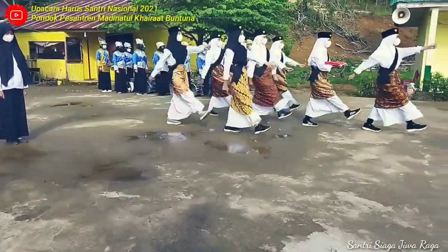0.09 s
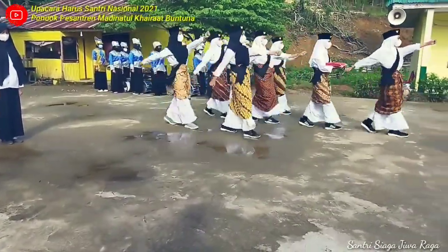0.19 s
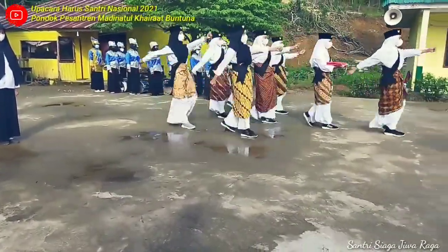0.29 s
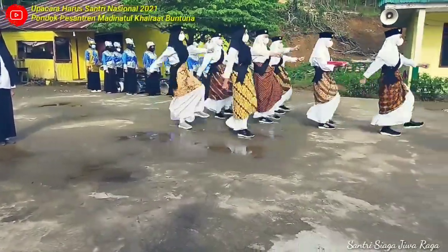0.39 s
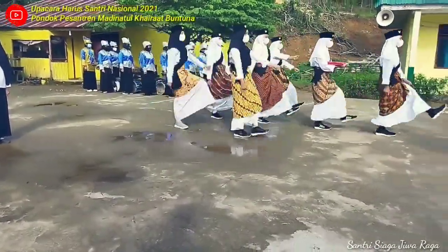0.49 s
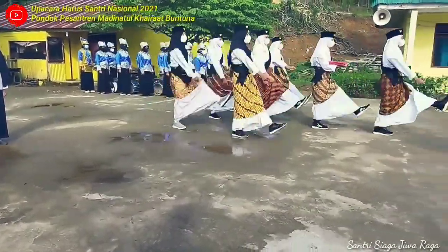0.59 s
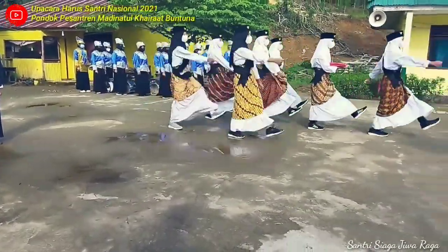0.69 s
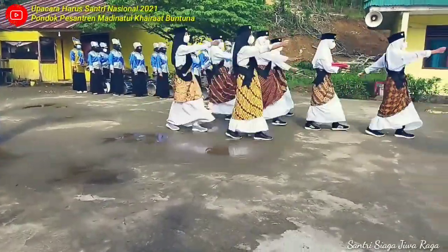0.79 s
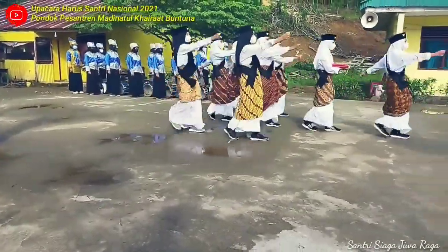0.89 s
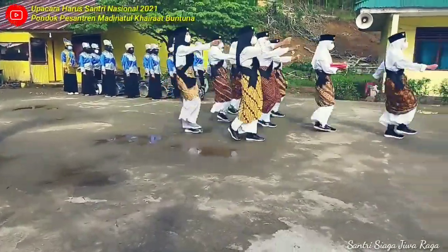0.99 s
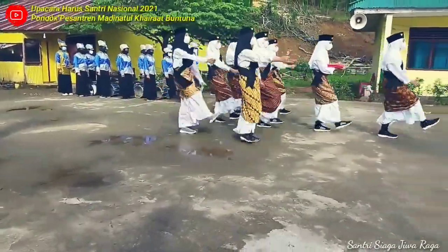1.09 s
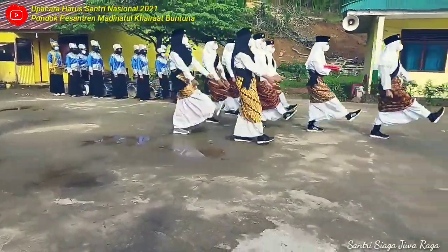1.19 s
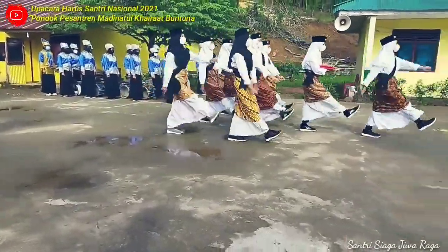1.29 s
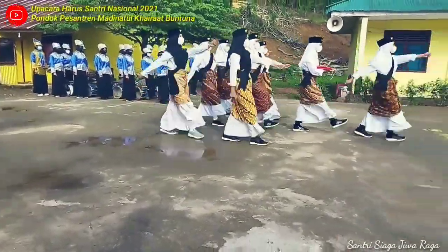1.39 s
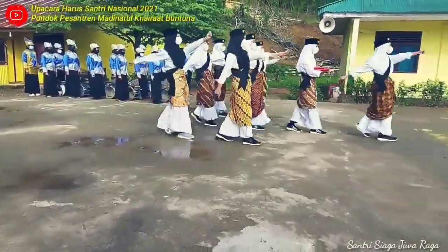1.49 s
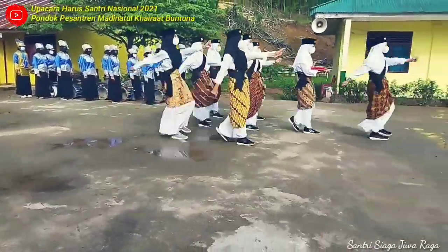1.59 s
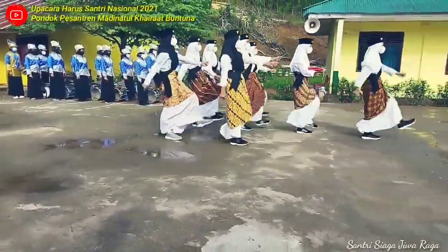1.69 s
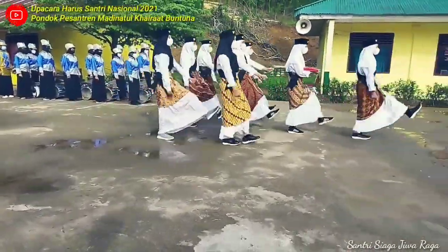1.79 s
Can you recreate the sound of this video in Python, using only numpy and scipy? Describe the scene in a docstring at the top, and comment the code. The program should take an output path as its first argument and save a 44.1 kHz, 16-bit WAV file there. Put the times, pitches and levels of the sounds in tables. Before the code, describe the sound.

Marching footsteps on damp concrete: three ragged volleys of flat, sharp sole slaps at about 0.2, 0.82 and 1.45 seconds, each spread over roughly a tenth of a second with gritty scuffing. Buildings return a short wash and faint slap-backs. Dull low microphone bumps near 0.24, 0.45 and 0.87, a soft footfall at 1.15. A faint bird's falling whistles, clearest around 1.0, over steady outdoor rumble and hiss.

```python
"""A small squad marches three paces across a damp concrete yard, not quite in unison: volleys of sole slaps.
Each slap is three bands of shaped noise plus a short ring; dense random grains make the gritty scuff under it.
The buildings answer with a short wash of decaying noise and two faint slap-backs.
Low decaying sines make dull bumps at the microphone and one soft footfall; a faint, distant bird whistles falling notes.
Open air surrounds it all as coloured noise, a steady rumble and hiss."""
import sys
import numpy as np
from scipy import signal
from scipy.fft import rfft, irfft, next_fast_len
from scipy.io import wavfile
from scipy.ndimage import uniform_filter1d

SR = 44100
rng = np.random.default_rng(int(sys.argv[2]) if len(sys.argv) > 2 else 0)


def generate_wav(sig):
    """Save sig (samples, or channels by samples) to the path in sys.argv[1] as 16-bit PCM at SR."""
    pcm = np.round(np.clip(np.atleast_2d(sig).T, -1, 1) * 32767).astype(np.int16)
    wavfile.write(sys.argv[1], SR, pcm)


N = 81585
T = np.arange(N) / SR  # s

# Open air around the microphone, spectrum shape: (f/Hz, relative level/dB per Hz)
AIR_COLOUR = [(12, -24), (20, 4), (30, -14), (38, -23), (53, -9), (112, -11), (125, -9), (140, -17.5),
              (175, -24), (281, -26), (323, -28), (351, -29.5), (463, -27), (612, -29), (703, -33.5),
              (831, -24), (981, -34.5), (1130, -29), (1530, -33), (1810, -31), (4170, -35), (5980, -43.5),
              (8590, -31), (11300, -43), (15400, -41)]
AIR_DB = -49.5  # rms

# Soles meeting the ground: (t/s, level/dB before trims, hollow body/dB and bright crack/dB
# relative to the middle smack, ring f/Hz)
SLAPS = [(0.203, -41, -18, 7.5, 960), (0.2106, -24.5, 1, 3, 980), (0.2206, -21.5, -7, 6, 1374),
         (.2250, -25.5, -10, 3, 660), (0.2313, -27, -6, -10, 1383), (.2400, -32.5, 6.5, -4, 480),
         (.2450, -30, 3.5, 5, 1050), (0.2528, -33.5, -6, -7, 633), (0.265, -27.5, -2, -4, 2245),
         (0.2671, -30, -2, 6, 2745), (.4510, -50, -3, -2, 1190), (0.8206, -51.5, 8, 14.5, 770),
         (.8275, -25.5, -29, -11, 510), (0.8334, -27, 2, 3.5, 1410), (0.8401, -25, -7, -18, 1480),
         (.8510, -29.5, -3.5, 8.5, 2810), (0.8599, -29, 2, -18, 2020), (0.864, -27.5, -5, -7, 1410),
         (0.8705, -46.5, 9.5, -8, 674), (0.88, -29, -5, 9, 2200), (.8862, -26, -4.5, 6, 760),
         (0.8912, -34.5, -15, -1, 4770), (0.898, -37, -1.5, 5, 2650), (1.1540, -54.5, 7, -14, 613),
         (1.4530, -27.5, 2.5, 6, 680), (1.4641, -29.5, 0.5, 5, 600), (1.4690, -26, -18, 9, 578),
         (1.4730, -24, 0, 4.5, 1316), (1.4846, -23.5, -8.5, -0.5, 970), (1.4924, -30, -10, 2, 1540),
         (1.5000, -37, -12, 14, 1510), (1.5120, -32.5, 1.5, -9, 980), (1.5148, -35, 3.5, 8, 1020),
         (1.534, -30, -14, 12, 2440), (1.5361, -25.5, -9, -6, 908), (1.54, -34.5, 1, 4, 2497),
         (1.5470, -43.5, 5, -6, 740)]
SLAP_TRIM_DB, RING_TRIM_DB = 0.5, -2
SLAP_ATTACK_S = 0.00071  # a sole flattens onto the ground
SNAP_T60_S, SNAP_SHARE = 0.0084, 0.11  # the first snap and its share of the power
BODY_T60_S, MID_T60_S, CRACK_T60_S, RING_T60_S = 0.086, 0.076, 0.052, 0.055
BODY_TOP_HZ, CRACK_BOTTOM_HZ = 1296, 3780
# Overall tone of the slaps: (f/Hz, relative level/dB per Hz)
SOLE_COLOUR = [(88, -41), (150, -4), (366, -2.5), (629, 2.5), (693, 1), (779, 2.5), (858, -1), (1060, 2.5),
               (1190, -5.5), (1370, -2), (1760, -4), (2690, -2.5), (2970, -6.5), (3820, -14.5),
               (4810, -11.5), (6190, -22.5), (8450, -11), (11300, -20.5), (15400, -12.5)]
# Resonances of soles and ground, a negative lift being a dip: (f/Hz, width/Hz, lift/dB)
SOLE_RESONANCES = [(385, 70, -4), (502, 35, 5), (633, 45, 5), (772, 35, 3), (920, 35, 2), (1416, 50, 3),
                   (1588, 45, 3), (1925, 35, 5), (2248, 45, 5), (2464, 40, 3), (2609, 60, 3), (2723, 30, 4),
                   (3132, 30, 4), (8500, 100, 3)]

# Soles grinding on grit: (t/s, length/s, relative level/dB)
SCUFFS = [(0.214, 0.05, -35.5), (.330, 0.046, -52.5), (0.822, 0.083, -35.5), (0.982, 0.0075, -48.5),
          (1.491, 0.052, -37), (1.648, 0.021, -54), (1.763, 0.018, -43), (1.784, 0.014, -52)]
SCUFF_ATTACK_S, SCUFF_T60_S = 0.0046, 0.059
GRAINS_PER_S, GRAIN_SPREAD_DB = 9000, 2.5  # mean rate; scale of the random grain levels
# Tone of the grit: (f/Hz, relative level/dB per Hz)
GRIT_COLOUR = [(150, -9), (600, -1), (2600, -6.5), (3600, -3), (4900, -4.5), (6200, -10), (7400, -9),
               (8500, 3), (11500, -8.5), (15300, -10.5)]

# Tone of the yard's wash: (f/Hz, level/dB)
YARD_COLOUR = [(150, -9), (400, -12.5), (800, -13), (1600, -12.5), (2200, -12.5), (2750, -15.5),
               (3600, -12.5), (5500, -17), (9000, -15.5), (15000, -13.5)]
# Decay of the yard's wash: (f/Hz, t60/s)
YARD_T60 = [(150, 1), (700, 0.95), (2500, 0.58), (6000, 0.6), (15000, 0.53)]
YARD_BUILD_S = 0.0089
SLAP_SEND_DB = 1  # slaps into wash and slap-backs

# Dull bumps at the microphone and, last, one soft footfall:
# (t/s, level/dB, settled f/Hz, knock relative to the low cycles/dB)
THUDS = [(0.236, -34.5, 125, -0.5), (.450, -35, 125, -1.5), (0.866, -44.5, 66.3, -13),
         (1.152, -51.5, 140, 9)]
THUD_HOLD_S, THUD_T60_S = 0.027, 0.013
THUD_SAG_HZ, THUD_SAG_S = 140, 0.0039  # starting pitch above the settled one; time constant
KNOCK_HZ, KNOCK_T60_S = 308, 0.068

# Distant bird's notes: (t/s, length/s, start f/Hz, end f/Hz, level/dB before the swell, blur cutoff/Hz)
BIRD_NOTES = [(0.262, .155, 8160, 5000, -60, 90), (.65, .10, 4900, 3970, -65, 199),
              (0.972, 0.098, 5130, 4250, -49.5, 480), (1.014, .19, 5280, 4680, -64.5, 282),
              (1.019, .10, 3930, 3555, -53.5, 379.6)]
BIRD_FLUTTER_DB, BIRD_FLUTTER_HZ = 0.5, 90  # rms depth; low-pass cutoff of the flutter

# Slap-backs from the nearest buildings: (delay/s, level/dB)
ECHOES = [(0.111, -32), (.168, -35)]
ECHO_TOP_HZ = 8800

CUTOFF_HZ = 15550


def from_db(db):
    """Decibels to amplitude gain."""
    return 10 ** (np.asarray(db) / 20)


def rms_one(x):
    """Scale to rms 1."""
    return x / np.sqrt(np.mean(x ** 2) + 1e-20)


def at_hz(points, hz):
    """Read a table on a log-frequency axis."""
    f, value = np.transpose(points)
    return np.interp(np.log(np.maximum(hz, 1)), np.log(f), value)


def fade(t, t60):
    """Full until time zero, then 60 dB down per t60."""
    return np.exp(-np.log(1000) * np.maximum(t, 0) / t60)


def colour(x, points, resonances=()):
    """Causal minimum-phase filter of unit power gain that follows a spectrum, with resonances on top."""
    size = 2 * next_fast_len(N)
    hz = np.arange(size // 2 + 1) * SR / size
    db = at_hz(points, hz)
    for f, width, lift in resonances:
        db = db + lift / (1 + (2 * (hz - f) / width) ** 2)
    # Folding the cepstrum onto positive times makes the filter causal
    cepstrum = irfft(np.log(rms_one(from_db(db))))
    cepstrum[1:size // 2] *= 2
    cepstrum[size // 2 + 1:] = 0
    return irfft(rfft(x, size) * np.exp(rfft(cepstrum)))[:N]


def band(x, hz, kind, order=2):
    """Butterworth filter."""
    return signal.sosfilt(signal.butter(order, hz, kind, fs=SR, output="sos"), x)


def air():
    """Open air at the microphone: steady coloured noise, a rumble and hiss."""
    return from_db(AIR_DB) * rms_one(colour(rng.standard_normal(N), AIR_COLOUR))


def burst(t60, size=8192):
    """A sole's snap and dying scatter of contacts: noise flattened in spectrum, then shaped in time."""
    t = T[:size]
    scatter_power = (1 - SNAP_SHARE) * rms_one(fade(t, t60)) ** 2
    snap_power = SNAP_SHARE * rms_one(fade(t, SNAP_T60_S)) ** 2
    shape = np.sqrt(scatter_power + snap_power)
    spectrum = rfft(rng.standard_normal(size) * shape)
    flat = irfft(spectrum / np.abs(spectrum))
    # Level out the short-term power before the decay is applied again
    local_rms = np.sqrt(np.abs(uniform_filter1d(flat * flat, size=128)) + 1e-20)
    attack = 1 - np.exp(-t / SLAP_ATTACK_S)
    contacts = flat / local_rms * shape * attack
    return rms_one(contacts) * np.sqrt(np.mean(fade(t, t60) ** 2))


def slaps():
    """Every sole strikes a hollow body, a middle smack and a bright crack, each with its own decay."""
    body, mid, crack = parts = np.zeros((3, 2 * N))
    decays = (BODY_T60_S, MID_T60_S, CRACK_T60_S)
    for s, db, body_db, crack_db, _ in SLAPS:
        start = int(s * SR)
        for part, part_db, t60 in zip(parts, (body_db, 0, crack_db), decays):
            hit = burst(t60)
            part[start:start + len(hit)] += from_db(SLAP_TRIM_DB + db + part_db) * hit
    hits = band(body, BODY_TOP_HZ, "low", order=3)
    hits += band(mid, [BODY_TOP_HZ, CRACK_BOTTOM_HZ], "band")
    hits += band(crack, CRACK_BOTTOM_HZ, "high", order=3)
    return hits[:N]


def sole_rings():
    """Each sole rings briefly as a decaying sine at its listed pitch, with random polarity."""
    out = np.zeros(N)
    for s, db, _, _, hz in SLAPS:
        t = np.maximum(T - s, 0)
        tone = np.sin(2 * np.pi * hz * t) * fade(t, RING_T60_S)
        out += rng.choice([-1, 1]) * from_db(db + RING_TRIM_DB) * tone
    return out


def scuffs():
    """Soles settle on sand: dense random grain impulses follow the pressure and take the grit's tone."""
    pressure = np.zeros(N)
    for s, length, db in SCUFFS:
        attack = np.clip((T - s) / SCUFF_ATTACK_S, 0, 1)
        pressure += from_db(db) * attack * fade(T - s - length, SCUFF_T60_S)
    grain_db = GRAIN_SPREAD_DB * np.minimum(rng.exponential(1, N), 4)
    sizes = from_db(grain_db) * rng.choice([-1, 1], N)
    grains = sizes * (rng.random(N) < GRAINS_PER_S / SR)
    return colour(pressure * rms_one(grains), GRIT_COLOUR)


def yard(x):
    """Scattered echoes from walls and hillside: noise bands decaying at their own rates, lows longest."""
    edges = np.geomspace(100, 16000, 12)
    response = np.zeros(N)
    for low, high in zip(edges, edges[1:]):
        hz = np.sqrt(low * high)
        build = 1 - np.exp(-T / YARD_BUILD_S)
        shape = rms_one(fade(T, at_hz(YARD_T60, hz)) * build) / np.sqrt(N)  # unit energy
        noise = band(rng.standard_normal(N), [low, high], "band")
        response += from_db(at_hz(YARD_COLOUR, hz)) * shape * noise
    return signal.fftconvolve(x, response)[:N]


def thuds():
    """Bumps at the microphone and a soft footfall: a decaying knock over low cycles that sag in pitch."""
    out = np.zeros(N)
    for s, db, hz, knock_db in THUDS:
        t = np.maximum(T - s, 0)
        turns = hz * t + THUD_SAG_HZ * THUD_SAG_S * (1 - np.exp(-t / THUD_SAG_S))
        low_cycles = np.sin(2 * np.pi * turns) * fade(t - THUD_HOLD_S, THUD_T60_S)
        knock = from_db(knock_db) * np.sin(2 * np.pi * KNOCK_HZ * t) * fade(t, KNOCK_T60_S)
        out -= from_db(db) * (low_cycles + knock)  # pressure goes negative first
    return out


def bird():
    """Thin falling whistles, fluttering in level; noise on the carrier blurs them with distance."""
    out = np.zeros(N)
    for s, length, start_hz, end_hz, db, blur_hz in BIRD_NOTES:
        along = np.clip((T - s) / length, 0, 1)
        phase = 2 * np.pi * np.cumsum(start_hz * (end_hz / start_hz) ** along) / SR
        blur = band(rng.standard_normal(N) + 1j * rng.standard_normal(N), blur_hz, "low")
        wander = rms_one(band(rng.standard_normal(N), BIRD_FLUTTER_HZ, "low"))
        flutter = from_db(BIRD_FLUTTER_DB * wander)
        whistle = rms_one(flutter * np.real(blur * np.exp(1j * phase)))
        swell = np.sqrt(np.abs(np.sin(np.pi * along)))
        out += from_db(db) * swell * whistle
    return out


def echoes(x):
    """Faint slap-back from the nearest buildings: delayed copies with softened treble."""
    delayed = sum(from_db(db) * np.interp(T - delay, T, x, left=0) for delay, db in ECHOES)
    return band(delayed, ECHO_TOP_HZ, "low")


def scene():
    """The marchers in their yard, with the background; sole rings and resonances are in the direct sound only."""
    background = air()
    hits, grit = slaps(), scuffs()
    direct = colour(hits, SOLE_COLOUR, SOLE_RESONANCES) + sole_rings() + grit
    spread = from_db(SLAP_SEND_DB) * colour(hits, SOLE_COLOUR) + grit
    mix = background + direct + yard(spread) + thuds() + bird() + echoes(spread)
    return mix[None]


def record(dry):
    """A steep elliptic low-pass cuts the top of the spectrum."""
    # 0.2 dB passband ripple, 70 dB stopband rejection
    return signal.sosfilt(signal.ellip(10, 0.2, 70, CUTOFF_HZ, fs=SR, output="sos"), dry)


dry = scene()
out = record(dry)
generate_wav(out)
```